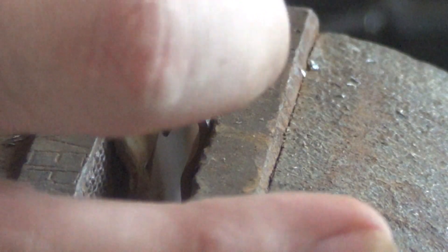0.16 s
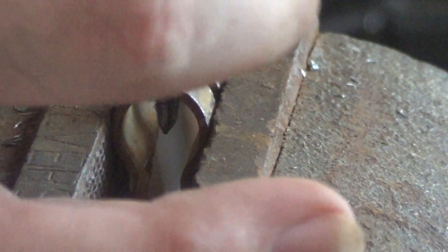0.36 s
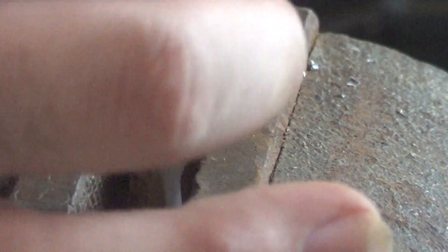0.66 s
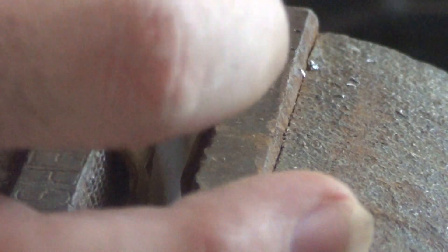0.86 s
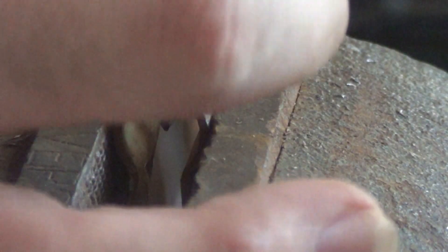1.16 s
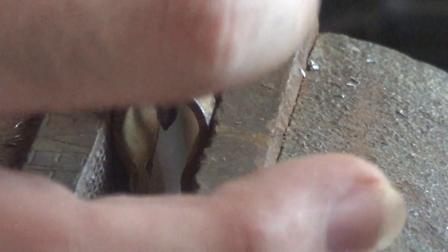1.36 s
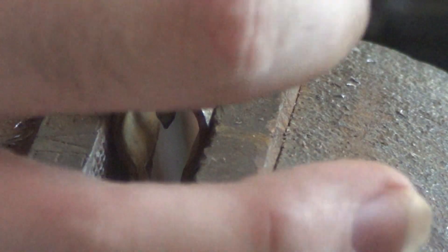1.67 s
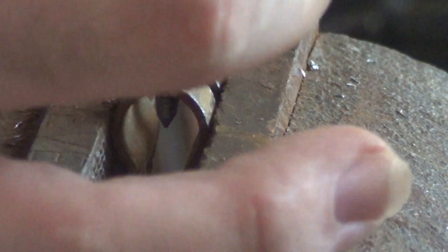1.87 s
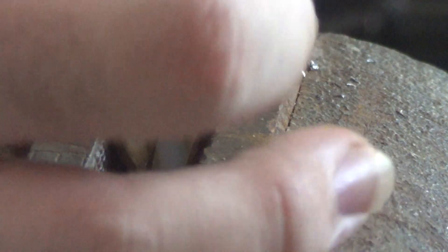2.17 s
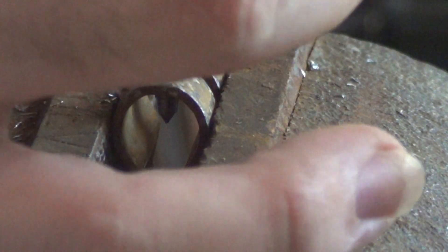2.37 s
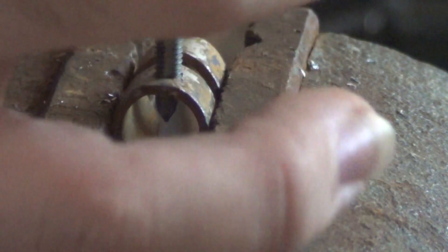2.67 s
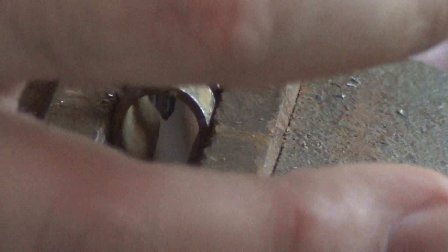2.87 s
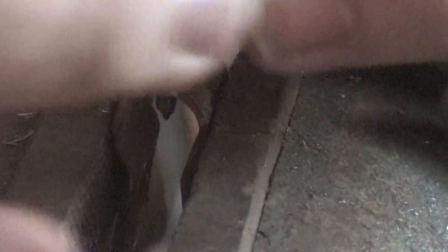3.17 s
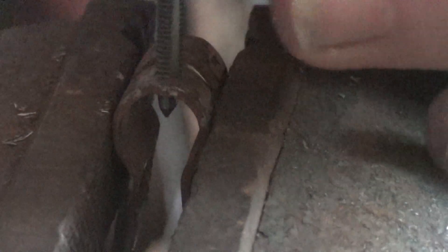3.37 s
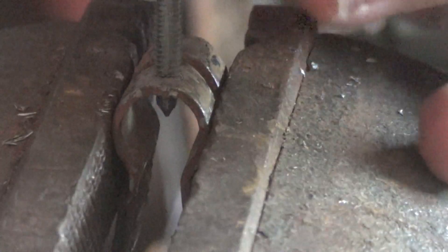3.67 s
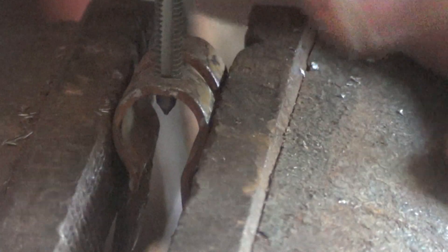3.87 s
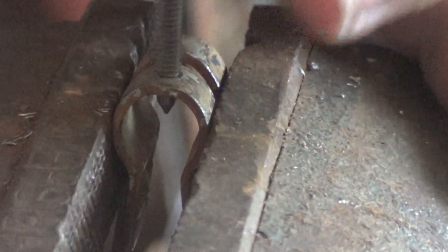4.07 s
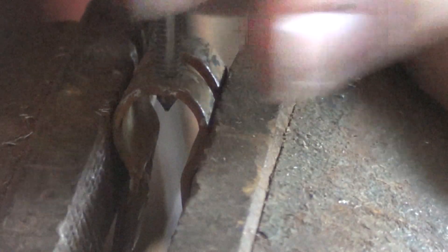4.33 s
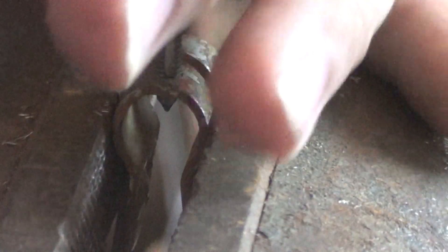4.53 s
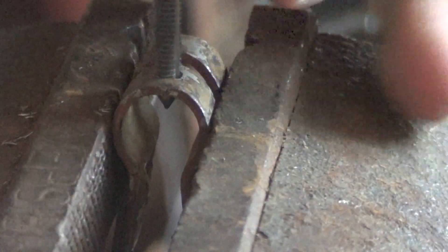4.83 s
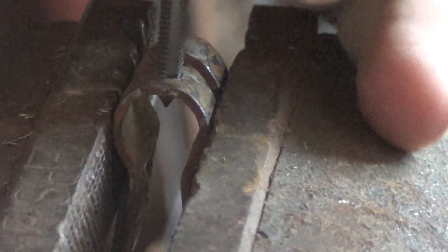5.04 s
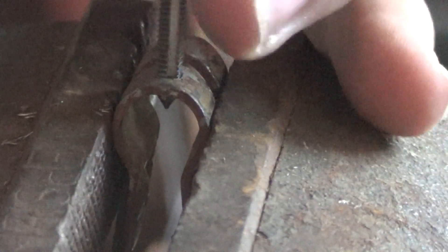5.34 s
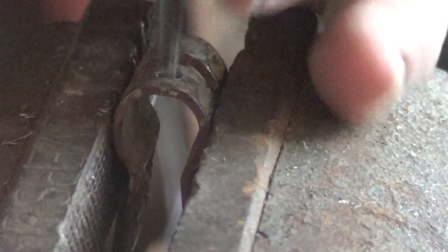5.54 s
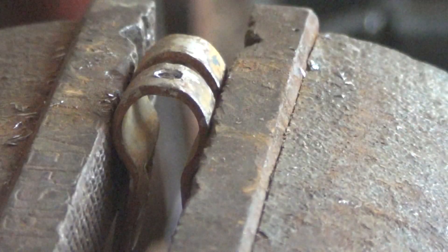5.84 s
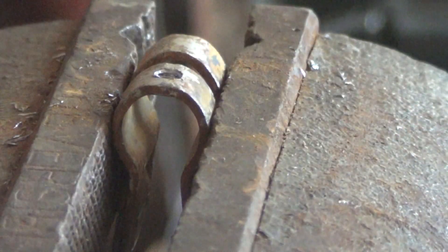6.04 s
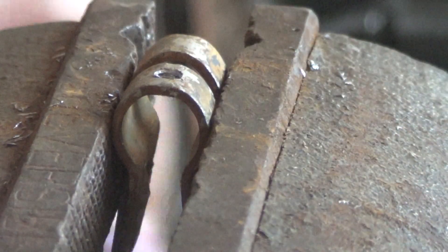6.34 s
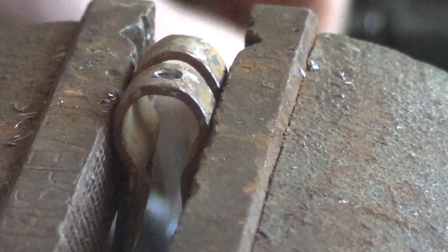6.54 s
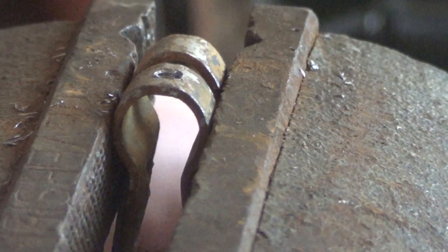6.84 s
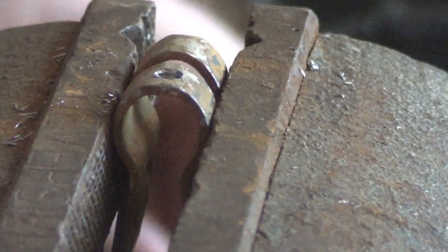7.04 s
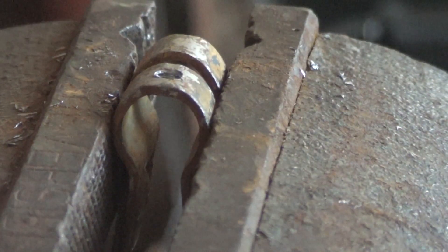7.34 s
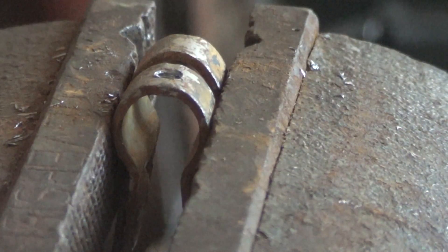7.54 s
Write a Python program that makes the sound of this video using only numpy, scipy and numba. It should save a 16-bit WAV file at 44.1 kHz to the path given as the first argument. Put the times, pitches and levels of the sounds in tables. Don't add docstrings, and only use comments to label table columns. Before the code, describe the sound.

A hand-turned thread tap ticks and chatters lightly in a clamped steel part, then tools knock on a wooden bench and steel scrapes singing over the vise.

```python
import sys
import numpy as np
from scipy import signal
from scipy.fft import rfft, irfft, next_fast_len
from scipy.io import wavfile
from scipy.ndimage import uniform_filter1d
from numba import njit

SR = 44100
rng = np.random.default_rng(int(sys.argv[2]) if len(sys.argv) > 2 else 0)


def magnitude_from_level(level_db):
    exponent = np.asarray(level_db, float) / 20
    return 10 ** exponent


def bounce(signal):
    frames = np.transpose(np.atleast_2d(signal))
    limited = np.clip(frames, -1, 1)
    pcm = np.round(limited * 32767).astype(np.int16)
    wavfile.write(sys.argv[1], SR, pcm)


N = 339657


def level(x, db):
    return x * magnitude_from_level(db) / np.sqrt(np.mean(x ** 2))


def peak(x, db):
    return x * magnitude_from_level(db) / np.abs(x).max()


def add(out, s, x):
    i = int(s * SR)
    out[i:i + len(x)] += x[:N - i]


def high(x, hz):
    return signal.sosfilt(signal.butter(3, hz, "high", fs=SR, output="sos"), x)


@njit
def svf(x, hz, damping):
    y = np.empty(len(x))
    b, l = 0., 0.
    for i in range(len(x)):
        g = np.tan(np.pi * hz[i] / SR)
        v = (b + g * (x[i] - l)) / (1 + g * (g + damping))
        b, l, y[i] = 2 * v - b, l + 2 * g * v, damping * v
    return y


def band(x, hz, width_hz):
    return svf(x, np.full(len(x), 1. * hz), width_hz / hz)


def on_axis(points, size):
    hz, db = np.transpose(points)
    bins_hz = np.fft.rfftfreq(size, 1 / SR)
    return magnitude_from_level(np.interp(np.log(bins_hz + 1), np.log(hz), db))


def ring(hz, db, t60, phase, seconds):
    t = np.arange(int(seconds * SR))[:, None] / SR
    modes = np.sin(2 * np.pi * hz * t + phase) * np.exp(-np.log(1000) * t / t60)
    return (magnitude_from_level(db) * modes).sum(axis=1)


def burst(rise_s, fall_s, noise):
    t = np.arange(len(noise)) / SR
    return noise * (1 - np.exp(-t / rise_s)) * np.exp(-t / fall_s)


def walk(rate):
    k = int(SR / rate)
    held = np.repeat(rng.standard_normal(N // k + 1), k)
    return 1.3 * uniform_filter1d(uniform_filter1d(held, k), k)[:N]


def grit(spread_db):
    size_db = spread_db * np.minimum(rng.exponential(size=N), 4)
    return level(rng.standard_normal(N) * magnitude_from_level(size_db), 0)


# f/Hz, level/dB per Hz
SHOP = [(20, -17), (62, -12), (120, -3), (400, 2), (800, -1.5), (2000, -3.5), (3300, -7), (15000, -10.5)]
# f/Hz, level/dB
SHOP_SIDE = [(60, -26), (250, -6.5), (1200, 0), (4400, -6), (8100, -6), (15000, -12.5)]
# f/Hz, width/Hz, level/dB
HUMS = [(466, 10, -67), (641, 6, -66), (6450, 250, -70), (9800, 300, -66), (10700, 500, -66)]


def shop():
    size = next_fast_len(N)
    mid, side = rfft(rng.standard_normal((2, size))) * on_axis(SHOP, size)
    mid = irfft(mid, size)[:N]
    side = irfft(side * on_axis(SHOP_SIDE, size), size)[:N]
    out = level(np.array([mid + side, mid - side]), -52) * magnitude_from_level(0.021 * walk(0.6))
    for hz, width_hz, db in HUMS:
        out = out + level(band(rng.standard_normal(N), hz, width_hz), db)
    whistle_hz, whistle_db = 15735, -63.5
    whistle = np.sqrt(2) * np.sin(2 * np.pi * whistle_hz * np.arange(N) / SR)
    return out + magnitude_from_level(whistle_db + 2.9 * walk(8)) * whistle


# t/s, level/dB
HANDS = [(0, -66.5), (1.4, -69), (1.6, -58), (2.2, -87), (3.3, -62), (5.2, -60), (7.1, -49.5), (7.2, -38.5),
         (7.402, -48.5), (7.7, -65)]


def hands():
    s, db = np.transpose(HANDS)
    cloth = np.array([band(band(grit(5.1), 910, 2000), 910, 2000) for _ in range(2)])
    swell_db = np.interp(np.arange(N) / SR, s, db) + 2 * walk(11) + 4.5
    return magnitude_from_level(swell_db) * level(cloth, 0)


# t/s, peak level/dB
JOLTS = [
    (6.531, -38),
    (6.687, -35),
    (7.141, -42),
]


def jolts():
    out = np.zeros(N)
    for s, peak_db in JOLTS:
        add(out, s, magnitude_from_level(peak_db) * np.hanning(int(0.0031 * SR)))
    return high(out, 22)


# t/s, peak level/dB, push/ms
KNOCKS = [
    (5.56, -39, 4.5),
    (5.825, -33.5, 0.14),
    (6.422, -26.5, 0.81),
    (6.531, -7, 0.69),
    (6.688, -4.5, 0.22),
    (6.709, -15.5, 0.12),
    (6.74, -13.5, 0.42),
    (7.136, -36, 0.36),
]
# f/Hz, level/dB
BENCH = [(71, -38), (160, -20.5), (420, -3.5), (844, 6), (1070, 0), (1900, 5.5), (5000, -43), (11000, -120)]
# f/Hz, level/dB
PLANK = [(409, -3), (472, 0), (574, -2), (706, 0), (810, 0), (850, 1), (952, -1), (1060, -1), (1192, -3),
         (1580, -6), (1703, -1), (1800, -4), (1955, -2)]


def bench():
    out = np.zeros(N)
    shape_hz, shape_db = np.transpose(BENCH)
    strong_hz, strong_db = np.transpose(PLANK)
    hz = np.linspace(130, 4200, num=150) + 9 * rng.standard_normal(size=150)
    db = np.interp(np.log(hz), np.log(shape_hz), shape_db)
    t60_s = 0.11 * (500 / hz) ** 0.14
    chance = rng.standard_normal((len(KNOCKS), 2, len(hz)))
    for (s, peak_db, push_ms), c in zip(KNOCKS, chance):
        wood = ring(hz, db + 1.6 * c[0], t60_s, 1.7 * c[1], .3)
        plank_hz = strong_hz * (1 + 0.012 * c[1, :len(PLANK)])
        plank_db = strong_db + 2.5 + 2 * c[0, :len(PLANK)]
        wood = wood + ring(plank_hz, plank_db, 0.13, 0, .3)
        wood = wood * np.clip(np.arange(len(wood)) / SR / 0.0006, 0, 1)
        push = np.hanning(3 + int(push_ms * SR / 1000))
        add(out, s, peak(np.convolve(wood, push), peak_db))
    return out


# t/s, peak level/dB, f/Hz
THUMPS = [(1.401, -45.5, 390), (1.44, -47, 405), (1.844, -39, 357), (1.892, -48, 350), (1.965, -56, 345),
          (2.243, -49, 388), (2.299, -52, 356), (2.656, -41.5, 364), (2.911, -46, 360), (3.388, -50, 396),
          (3.783, -47, 403), (4.202, -47.5, 388), (4.223, -43.5, 362), (4.742, -44, 352), ]
# multiple of f, level/dB, t60/s
VISE = [(1, 5, .13), (1.09, -13, .1), (1.95, 0, 0.088)]


def vise():
    out = np.zeros(N)
    ratio, db, t60 = np.transpose(VISE)
    for (s, peak_db, hz), c in zip(THUMPS, rng.standard_normal((len(THUMPS), len(VISE)))):
        jaws = ring(hz * ratio, db + 3 * c, t60, 0, 0.25)
        add(out, s - .003, peak(np.convolve(jaws, np.hanning(60)), peak_db))
    return out


# t/s, f/Hz
GRAIN = [(.35, 7850), (.42, 6960), (.78, 7400), (1.4, 10300), (2.3, 10570), (3.05, 6750), (3.3, 8600),
         (3.95, 10700), (4.85, 9700), (5.8, 8200), (6.43, 8600), (6.72, 9000), (7.15, 9000), (7.35, 7000),
         (7.46, 8200), (7.7, 8400)]


def hiss_centre():
    return np.interp(np.arange(N) / SR, *np.transpose(GRAIN))


# t/s, level/dB
DRAG = [(7.449, -33), (7.475, -37), (7.505, -25.5), (7.53, -29.5), (7.57, -29), (7.588, -29),
        (7.605, -28.5), (7.645, -28), (7.66, -33.5)]
# f/Hz, width/Hz, level/dB
JAW = [(980, 14, -5), (1195, 20, -10), (1450, 30, -9), (1717, 16, 0), (2017, 14, -6), (2380, 20, -10),
       (2411, 14, -10), (2680, 40, -12), (2950, 30, -12), (3280, 25, -11), (3670, 30, -10), (4035, 16, -12),
       (4577, 14, -8), (6919, 18, -8)]


def dragging():
    t, hz = np.arange(N) / SR, hiss_centre()
    press = magnitude_from_level(np.interp(t, *np.transpose(DRAG), left=-200))
    slips = grit(2.6) * magnitude_from_level(1.2 * walk(200) + .7 * walk(60))
    sing_s = 7.49
    bite = np.clip((t - sing_s) / .05, 0, 1)
    lines = 0
    for f, w, db in JAW:
        waver = magnitude_from_level(db + 2.0 * walk(3 * w))
        lines = lines + waver * np.sin(2 * np.pi * f * t + .8 * walk(3 * w))
    dull = level(band(slips, 2440, 9100), 0.22)
    bright = level(svf(svf(slips, hz, 1.1), hz, 1.1), 0)
    return press * (magnitude_from_level(-5.5) * bright + magnitude_from_level(2.0) * (bite * level(lines, -1.5) + dull))


# f/Hz, level/dB, t60/s
SHANK = [(9120, -35, .15), (9330, -31, .22), (9480, -32, .2), (9690, -35, .14)]
# t/s, peak level/dB, f/Hz, t60/s
PINGS = [(5.386, -44, 9000, .03), (5.435, -41.5, 6280, .03), (5.453, -44, 6250, .04),
         (5.453, -42, 8960, 0.056), (5.564, -35, 10050, 0.083), (5.562, -39, 5750, .05),
         (5.58, -39, 8700, 0.028), (7.439, -40, 9000, .15), (7.553, -18, 10660, 0.042),
         (7.652, -26, 12200, .25), (7.652, -19, 10650, 0.087)]


def shank():
    out = np.zeros(N)
    add(out, 6.424, ring(*np.transpose(SHANK), 0, .3))
    for s, peak_db, hz, t60 in PINGS:
        pair_hz = hz * np.array([1, 1.006])
        add(out, s, ring(pair_hz, peak_db - np.array([3, 9]), t60, 0, .1))
    return out


def strokes(rows):
    slope_db = 20
    body_fall = 0.55
    t = np.arange(N) / SR
    hiss, body = np.full((2, N), -200.)
    for s, hiss_db, rel_db, rise_s, fall_s in rows:
        late = np.maximum(t - s, 0) / fall_s
        db = hiss_db - slope_db * np.maximum(s - t, 0) / rise_s
        hiss = np.maximum(hiss, db - slope_db * late)
        body = np.maximum(body, db + rel_db - slope_db * late / body_fall)
    return magnitude_from_level(hiss), magnitude_from_level(body)


def in_hole(s):
    grip_s, out_s = .95, 5.5
    let_go_s, regrip_s = 2.95, 3.25
    return (s > grip_s) & (s < out_s) & ~((s > let_go_s) & (s < regrip_s))


# t/s, hiss level/dB, body minus hiss/dB, rise/s, fall/s
RUBS_IN = [(.262, -48.5, 6, 0.0053, 0.073), (.328, -24, -15.5, 0.0065, 0.075),
           (.353, -29.5, -10, 0.036, 0.021), (.409, -45.5, 18, 0.0014, 0.03),
           (.42, -8.5, -21.5, 0.0052, 0.072), (.435, -16, -8.5, 0.013, 0.05), (.47, -35.5, 3, 0.037, 0.052),
           (.699, -28, -17.5, 0.076, 0.046), (.707, -31, 1.5, 0.003, 0.034),
           (.755, -24.5, -22, 0.15, 0.057), (1.01, -41, -8, 0.052, 0.09), (1.406, -54.5, 6, 0.018, 0.25),
           (1.535, -35, -7, .005, 0.0065), (1.6, -64, 10, 0.17, 0.19), (1.836, -46.5, 10.5, 0.0015, 0.12),
           (2.234, -52.5, 10, 0.0073, 0.071), (2.251, -45, 14, 0.0066, 0.06),
           (2.634, -29.5, -2.5, 0.0029, 0.054), (2.897, -33.5, -15, 0.018, 0.034),
           (2.942, -35, -14, 0.035, 0.015)]
RUBS_OUT = [(3.058, -20, -10, 0.011, 0.051), (3.09, -42.5, 5, 0.04, 0.022),
            (3.177, -25, -5.5, 0.0049, 0.067), (3.225, -26.5, -15, 0.041, 0.063),
            (3.276, -38.5, 12, 0.015, 0.016), (3.35, -37, -8.5, 0.45, 0.1), (3.658, -41, -7, 0.03, 0.13),
            (3.732, -36.5, -0.5, 0.029, .03), (3.777, -47, 6.5, 0.0056, 0.081),
            (3.82, -40.5, -1, 0.091, 0.018), (3.946, -30.5, -53, 0.11, 0.16),
            (4.08, -42.5, -4.5, 0.069, 0.2), (4.205, -28.5, -5, .009, 0.0076),
            (4.342, -32, -5.5, 0.0095, 0.021), (4.41, -37, -35, 0.084, .066), (4.72, -54, 11, 0.0084, 0.19),
            (4.848, -28.5, -4, 0.021, 0.0057), (5.238, -40, 0.5, 0.0051, 0.025),
            (5.457, -45, 4.5, 0.031, 0.012)]
RUBS_FREE = [(5.563, -43, 7, 0.01, 0.074), (5.83, -42, -1.5, 0.019, 0.29), (6.255, -40.5, -1, 0.018, 0.02),
             (6.286, -48.5, -0.5, .012, 0.22), (6.377, -41.5, -2, 0.023, 0.096),
             (6.425, -33.5, 0.5, 0.013, 0.2), (6.534, -41.5, 17, 0.0052, 0.048),
             (6.692, -36, 7, 0.091, 0.12), (6.712, -30, 8.5, 0.0061, 0.13), (6.743, -30.5, 3, .005, 0.15),
             (6.8, -43.5, 7.5, .1, 1), (6.977, -28.5, -22, 0.0091, 0.02), (7.03, -39, -11, 0.04, 0.77),
             (7.144, -7.5, -43, .004, 0.34), (7.197, -9, -35, 0.033, 0.099),
             (7.346, -24.5, 0.5, 0.022, 0.03), (7.452, -33, 3.5, 0.051, 0.011)]
WRENCH_HZ = [1040, 1170, 1450, 1820, 1950, 2020, 2130, 2550, 2660, 2800, 3020, 3120, 3300, 3450]
# level/dB, t60/s
WRENCH = [(-2, .032), (-3, .035), (-3, .04), (-3, .07), (2, .048), (-6, .05), (-8, .14), (-4, .04),
          (-1, .036), (-2, .045), (0, .06), (-3, .11), (-2, .14), (-4, .05)]


def rubbing():
    hiss, body = strokes(RUBS_IN + RUBS_OUT + RUBS_FREE)
    hz = hiss_centre()
    slips = grit(2.8) * magnitude_from_level(1.7 * walk(250))
    dull = level(high(band(slips, 1730, 1800), 836), 0)
    modes = sum(magnitude_from_level(db) * band(slips, f, 6 / t60) for f, (db, t60) in zip(WRENCH_HZ, WRENCH))
    ringing = level(modes, 0)
    through = np.clip(1.4 * body / (hiss + 1e-9), 0, .93) * in_hole(np.arange(N) / SR)
    bright = level(svf(svf(slips, hz, 0.74), hz, 0.73), 0)
    broad = level(high(band(slips, 3420, 8100), 1770), -5.5)
    broad = (1 - through) * np.sqrt(hiss * body) * broad
    low = body * ((1 - through) * dull + through * ringing)
    return magnitude_from_level(-17.5) * hiss * bright + broad + magnitude_from_level(-3.5) * low


# t/s, peak level/dB, freest f/Hz
RINGS = [(1.4044, -47, 1070), (1.5384, -45, 1020), (1.836, -47, 1070), (2.6309, -35.5, 1520),
         (3.1745, -32, 1410), (3.238, -40, 1030), (3.6553, -42, 1030), (4.085, -37, 1040),
         (4.266, -38, 1060), (4.7292, -45, 1550), (4.7842, -42, 999), (4.8522, -33, 1020),
         (5.4558, -39, 1170), (5.8273, -47, 1110), (5.8684, -37, 942),
         (0.3664, -36.5, 1970), (1.0074, -41, 1940), (1.4082, -46, 1970), (1.4236, -41, 1980),
             (1.5384, -41, 1920), (1.8374, -46, 1830), (1.8488, -29.5, 1900), (2.2564, -42, 1960),
             (2.631, -36, 1820), (2.6428, -28, 1800), (3.175, -31.5, 1800), (3.2236, -42, 1920),
             (3.2756, -34, 1950), (3.3052, -36, 1950), (3.3338, -47, 1960), (3.3706, -39, 1950),
             (3.6564, -39.5, 1950), (3.7147, -35, 1980), (3.735, -43, 1950), (3.7555, -35, 1970),
             (3.7796, -29, 1980), (3.8056, -48, 2000), (3.82, -47, 1950), (4.082, -41, 1880),
             (4.2088, -38, 1830), (4.2677, -41, 1840), (4.342, -43, 1970), (4.7202, -37, 1910),
             (4.7329, -35, 1930), (4.8264, -45, 1930), (4.9558, -39.5, 1900), (5.569, -41, 1950),
             (5.8394, -39.5, 1840),
         (0.2614, -40, 2770), (1.441, -38.5, 2680), (1.835, -31, 2400), (1.8395, -31.5, 3030),
              (2.2354, -34.5, 2800), (2.2507, -37, 2910), (2.2686, -37, 3120), (2.63, -35, 3040),
              (2.6422, -45, 2810), (2.6597, -34, 2820), (2.7077, -47, 2970), (3.174, -45, 3460),
              (3.2718, -37, 3500), (3.3025, -37, 2960), (3.335, -35, 2610), (3.6616, -48, 3100),
              (3.7013, -36, 2570), (3.778, -31.5, 2630), (3.7924, -36, 2670), (3.816, -46, 2710),
              (4.082, -41, 2560), (4.199, -36.5, 2860), (4.2, -38, 2660), (4.3392, -36.5, 2770),
              (4.7835, -49, 3130), (4.8314, -40, 2700), (4.845, -30, 2640), (4.953, -37, 2700),
              (5.233, -54, 3430), (5.4356, -46, 3060), (5.563, -35, 3500), (5.5867, -38, 3500),
              (5.8707, -42, 2540), (6.3765, -34.5, 2400),
         (.35, -46, 1950), (.378, -38, 1950), (1.851, -40, 3180), (2.259, -48, 3270),
              (2.265, -40, 2130), (2.642, -33, 2970), (2.66, -41, 2130), (3.175, -35, 1500),
              (6.425, -34, 3230), (6.426, -26, 1100), (6.69, -25, 3500), (6.715, -26, 3020),
              (7.445, -27, 2240), (7.446, -30, 1260), (7.452, -29, 3450), (7.504, -19, 1520)]


def wrench():
    out, hz = np.zeros(N), np.array(WRENCH_HZ)
    db, t60 = np.transpose(WRENCH)
    rows = RINGS
    for (s, peak_db, free_hz), c in zip(rows, rng.standard_normal((len(rows), 4, len(hz)))):
        held_db = db - 80 * np.abs(np.log2(hz / free_hz))
        body = ring(hz * (1 + .005 * c[0]), held_db + 1.5 * c[1], t60 * magnitude_from_level(1.5 * c[2]), 2 * c[3], .2)
        body = body + ring(hz * (1 + .03 * c[2]), held_db - 3, t60 / 2, 2 * c[1], .2)
        swell = 1 - np.exp(-np.arange(len(body)) / SR / 0.00052)
        add(out, s - .001, peak(body * swell, peak_db - 1.5))
    return out


# t/s, peak level/dB, f/Hz
TICKS_IN = [(0.2717, -27.5, 11100), (.308, -42, 6800), (.325, -30, 8900), (.411, -30, 3950),
            (0.435, -15, 6850), (0.366, -23, 9500), (0.383, -32, 9800), (0.4842, -17, 7930),
            (0.652, -29, 7240), (.7052, -21.5, 6300), (.7085, -22, 6960), (.64, -37, 9100),
            (.747, -34, 14000), (.768, -28, 10400), (.833, -31.5, 8800), (1.0084, -35, 10600),
            (1.405, -22, 10940), (1.4214, -29, 10200), (1.439, -36, 7940), (1.834, -36, 9400),
            (1.836, -21, 9600), (1.8426, -29, 10800), (1.844, -16, 10900), (1.861, -28, 10500),
            (1.891, -32.5, 6260), (1.917, -47, 6300), (2.2348, -22, 8740), (2.25, -17.5, 11000),
            (2.6308, -22, 9200), (2.632, -22.5, 5240), (2.641, -20, 8300), (2.896, -34, 7800),
            (2.909, -30, 11900), (2.943, -30.5, 9300), (3.003, -36, 6600)]
TICKS_OUT = [(3.052, -20, 7600), (3.058, -16, 7200), (3.064, -21, 7700), (3.073, -26, 7500),
             (3.177, -26, 6640), (3.261, -21, 9550), (3.2714, -20.5, 7930), (3.3312, -23, 9500),
             (3.349, -22, 8370), (3.302, -26, 10800), (3.477, -36, 6050), (3.495, -32, 9000),
             (3.502, -30.5, 10800), (3.6543, -29, 8200), (3.673, -30, 8950), (3.7003, -28.5, 8600),
             (3.711, -27, 10900), (3.724, -33, 7840), (3.756, -37, 9500), (4.165, -40, 10600),
             (3.7345, -21.5, 10100), (3.7761, -20.5, 10800), (3.8059, -22.5, 10260), (4.0612, -34, 7900),
             (4.0816, -29.5, 9100), (4.198, -24, 9900), (4.2042, -26.5, 9050), (4.219, -28.5, 9700),
             (4.3373, -29, 9500), (4.35, -32, 9900), (4.687, -37, 9450), (4.719, -32, 9800),
             (4.832, -35, 7800), (4.735, -26.5, 9800), (4.843, -12, 10440), (4.872, -37, 9900),
             (4.953, -28, 9850), (5.435, -39, 7400), (5.4538, -27.5, 10200)]
TICKS_FREE = [(5.563, -27, 11000), (5.568, -32, 9100), (5.582, -31, 9000), (5.586, -31, 9300),
              (5.7123, -36, 9750), (5.828, -28, 7650), (5.834, -36, 7500), (5.84, -30, 7700),
              (5.858, -45, 5870), (5.871, -34, 7450), (6.255, -30, 6550), (6.2875, -30.5, 7630),
              (6.376, -27.5, 7300), (6.424, -8.5, 9330), (6.426, -12, 9900), (6.5294, -19.5, 8100),
              (6.669, -19.5, 10100), (6.688, -12, 8400), (6.6877, -19, 3860), (6.7084, -3.5, 10380),
              (6.7406, -5.5, 9970), (6.975, -16.5, 10900), (6.98, -14.5, 8240), (7.083, -24, 6100),
              (7.107, -23, 7700), (7.1387, -3.5, 8820), (7.1383, -24, 3170), (7.139, -33, 1500),
              (7.1384, -8, 12800), (7.142, -9, 9000), (7.141, -12, 8900), (7.1426, -19, 12700),
              (7.147, -13, 8100), (7.169, -14, 9500), (7.1975, -14, 9650), (7.4634, -9, 9900),
              (7.4673, -5, 11180), (7.52, -8.5, 11200), (7.5246, -8, 9900), (7.551, -9.5, 10000),
              (7.584, -5.5, 10100), (7.6496, -7, 10350)]
# f/Hz, level/dB
TAP = [(5190, -16), (6300, -12), (9200, -8), (12700, -9)]


def tap():
    out = np.zeros(N)
    rows = TICKS_IN + TICKS_OUT + TICKS_FREE
    tap_hz, tap_db = np.transpose(TAP)
    for (s, peak_db, tick_hz), c in zip(rows, rng.standard_normal((len(rows), 240))):
        spread = np.linspace(-1.6, 1.6, num=24) + 0.095 * c[:24]
        octaves = .3 if s < 5.5 else .2
        cluster_hz = np.clip(tick_hz * 2 ** (octaves * spread), 1200, 15400)
        cluster_db = 2.5 * c[24:48] - 4.5 * spread ** 2
        modes = high(ring(cluster_hz, cluster_db, 0.009, 1.5 * c[48:72], .04), .5 * tick_hz)
        if in_hole(s):
            modes = modes + ring(tap_hz * (1 + 0.016 * c[-4:]), tap_db + 3 * c[-8:-4], .022, 0, .04)
        chatter = burst(0.0001, 0.001 * magnitude_from_level(2.5 * c[72]), c[73:])
        chatter[0] = 4.5
        add(out, s - .0004, peak(np.convolve(modes, chatter), peak_db))
    return out


# f/Hz, level/dB
NEAR_SIDE = [(60, -37), (400, -20), (1500, -16.5), (4400, -9), (8100, -11), (15000, -18)]


def ports(x):
    size = next_fast_len(N + 512)
    scatter = burst(0.00029, 0.0023, rng.standard_normal(size=400))
    scatter = rfft(scatter / np.linalg.norm(scatter), size)
    side = irfft(rfft(x, size) * scatter * on_axis(NEAR_SIDE, size), size)[:N]
    return np.array([x + side, x - side])


# f/Hz, t60/s
ROOM = [(150, 0.72), (600, 0.72), (2000, 0.29), (6000, 0.16), (13000, 0.067)]


def room(x):
    t, tail = np.arange(SR // 2 + SR // 4) / SR, 0
    for hz, t60 in ROOM:
        noise = np.array([band(rng.standard_normal(len(t)), hz, 3.6 * hz) for _ in range(3)])
        tail = tail + (noise[0] + 0.53 * noise[1:]) * np.exp(-np.log(1000) * t / t60)
    tail = tail * np.clip(t / 0.019, 0, 1)
    return signal.fftconvolve(x[None], tail / np.sqrt((tail ** 2).sum() / 2))[:, :N]


def scene():
    small = high(tap() + wrench() + rubbing() + shank(), 250)
    large = high(bench() + dragging() + vise(), 123)
    near = small + large
    balance = magnitude_from_level(np.array([[.2], [-.2]]))
    return ports(near) * balance + magnitude_from_level(-7.5) * room(near) + jolts() + hands() + shop()


def roll_off(x):
    return signal.sosfilt(signal.butter(12, 16990, fs=SR, output="sos"), x)


def record(dry):
    soft = .9 * np.tanh(dry / .9)
    top_hz = 15800
    cut = signal.sosfilt(signal.ellip(12, .3, 30, top_hz, fs=SR, output="sos"), soft)
    return roll_off(cut)


dry = scene()
out = record(dry)
bounce(out)
```